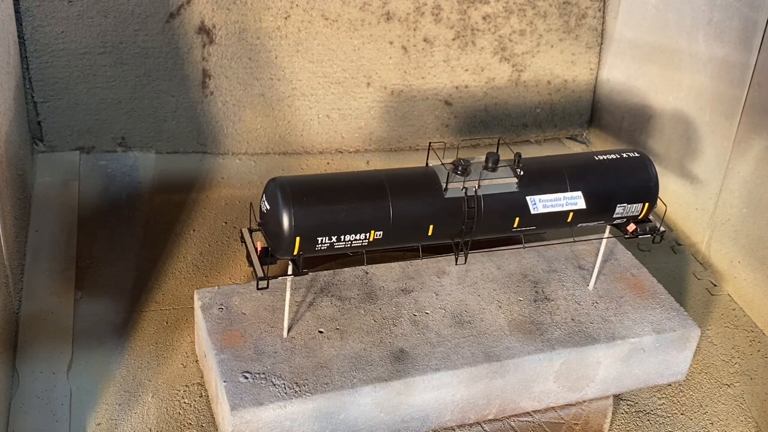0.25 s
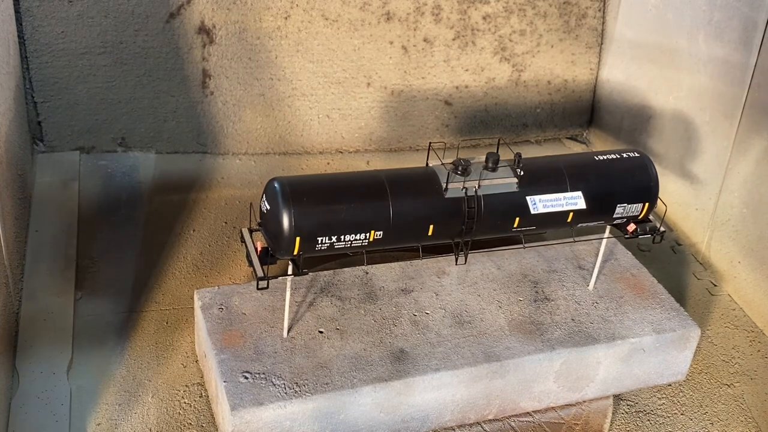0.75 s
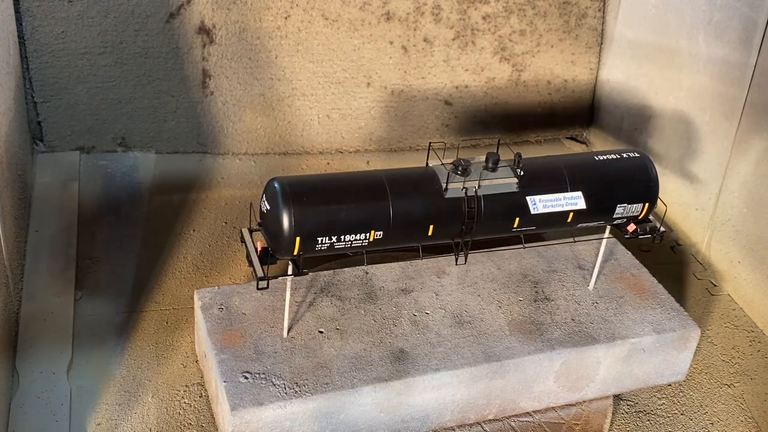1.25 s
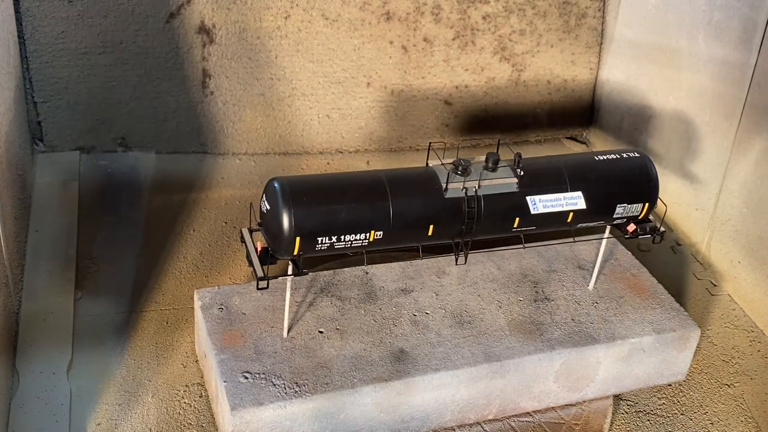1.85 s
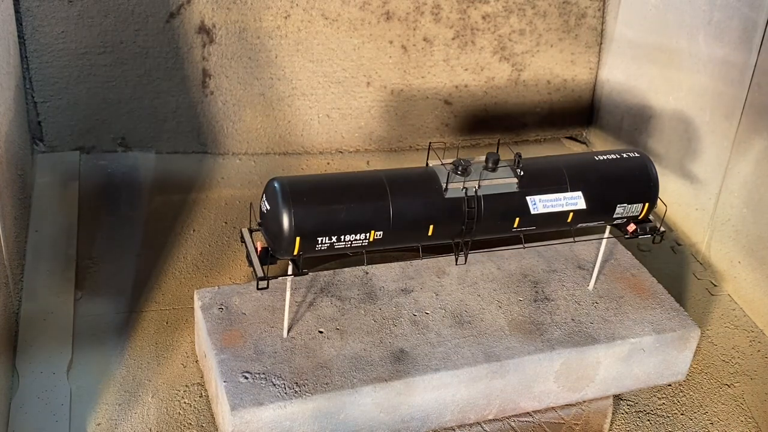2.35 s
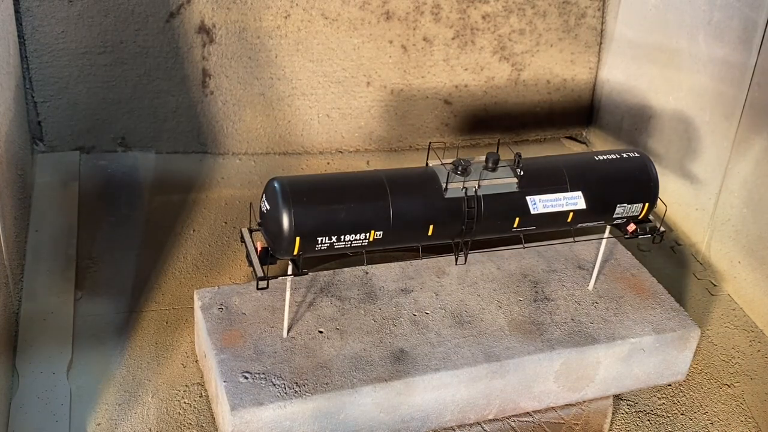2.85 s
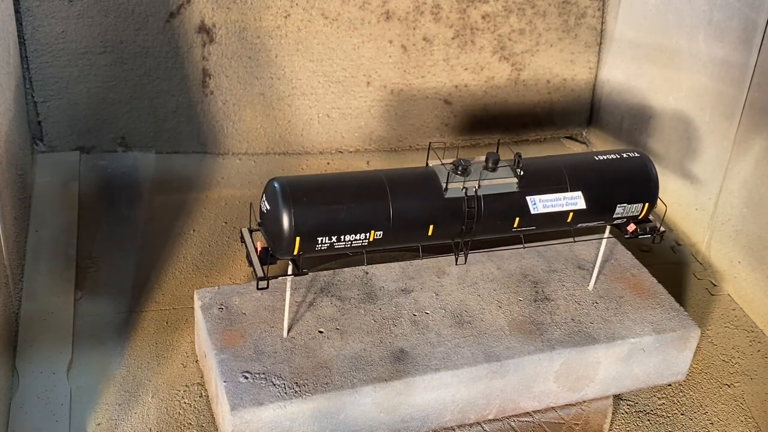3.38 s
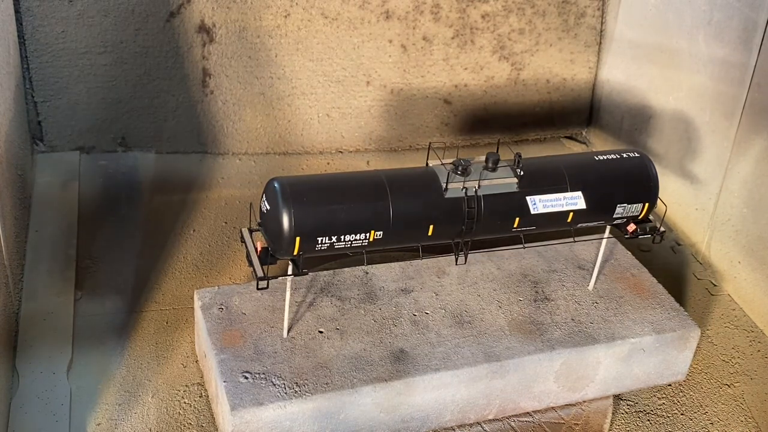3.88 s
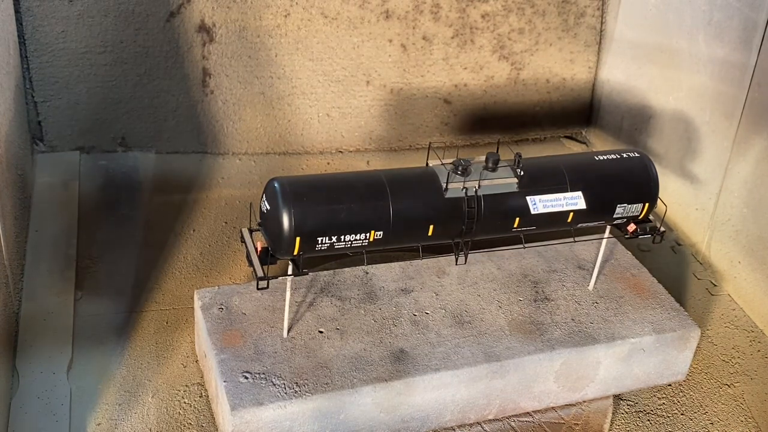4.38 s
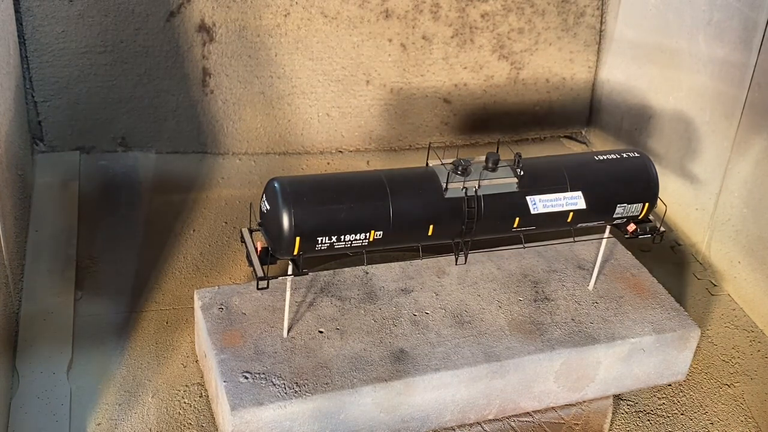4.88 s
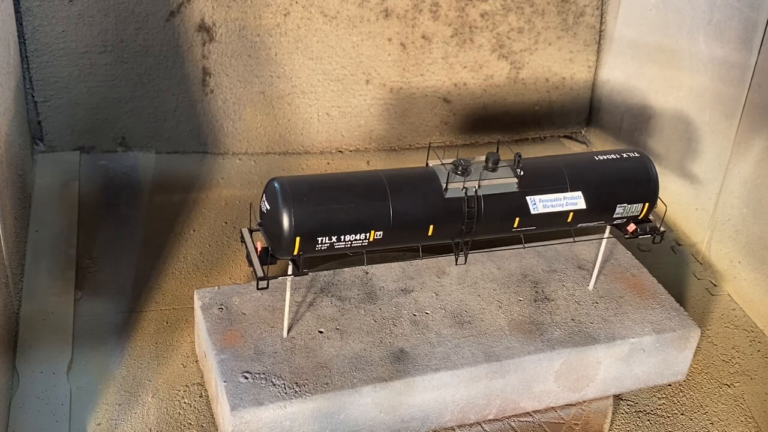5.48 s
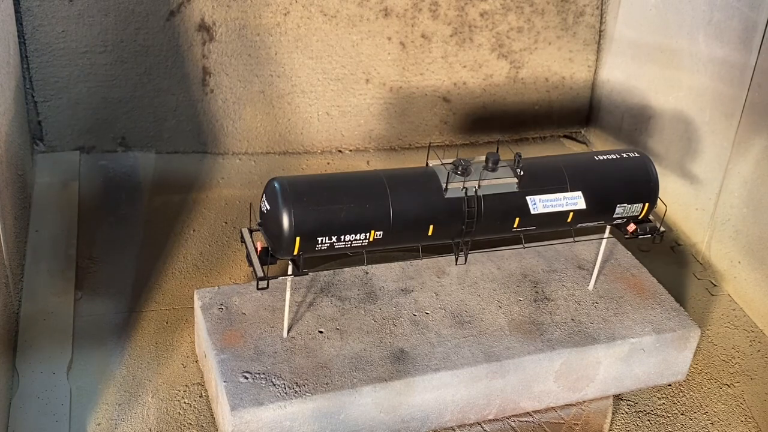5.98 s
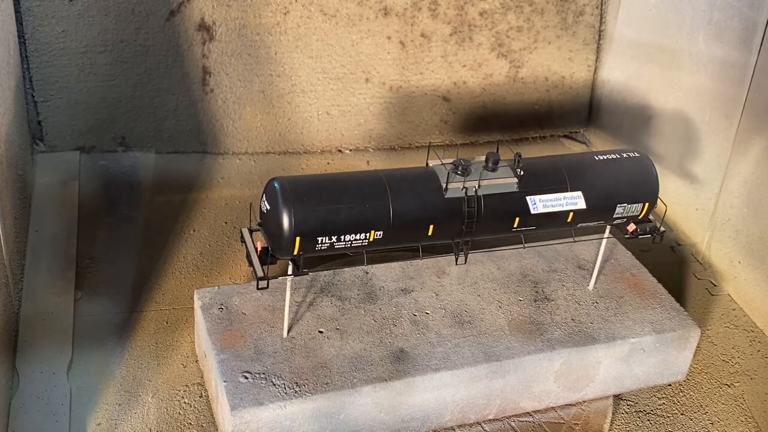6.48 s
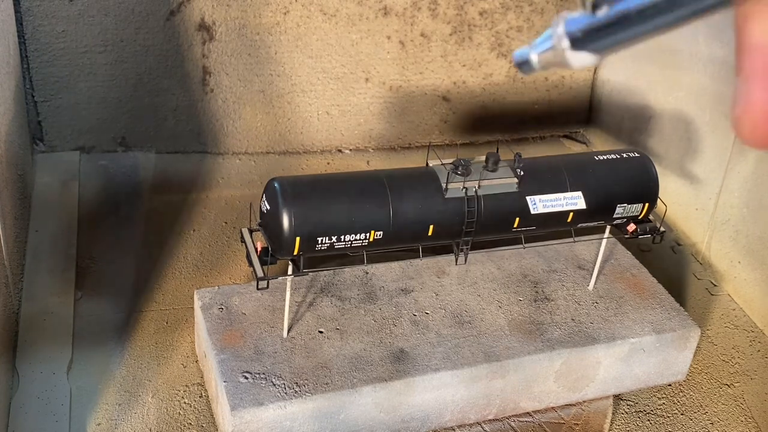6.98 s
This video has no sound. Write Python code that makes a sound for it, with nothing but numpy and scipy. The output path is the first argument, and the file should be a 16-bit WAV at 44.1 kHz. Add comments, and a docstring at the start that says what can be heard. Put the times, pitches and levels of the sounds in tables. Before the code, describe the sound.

After a hard click and some handling clatter, a fan's hum climbs steadily while an airbrush sprays short, bright hisses in a workshop.

```python
"""An airbrush hisses in eight bursts: a noise jet gated by the trigger valve, with a shifting reflection.
Before it a switch snaps and a spray-booth fan runs up: air noise and a three-blade tone climb through
the booth's resonances while motor tones sing. Filtered noise and ringing modes make the knocks, ticks,
slides and a scrape; soft puffs are low rumble. Airbrush and handling ring briefly in a small workshop;
a close pair of microphones listens."""
import sys
import numpy as np
from scipy import signal
from scipy.fft import rfft, irfft, next_fast_len
from scipy.io import wavfile

SR = 44100
rng = np.random.default_rng(int(sys.argv[2]) if len(sys.argv) > 2 else 0)


def transcribe(u):
    """Save the signal u as a 16-bit wav file named by the first command-line argument.

    u: samples, shape (n,) or (channels, n), limited to [-1, 1]; the rate is SR.
    q: integer samples, one column per channel.
    """
    v = np.clip(np.atleast_2d(u).T, -1, 1)
    q = np.round(v * 32767).astype(np.int16)
    wavfile.write(sys.argv[1], SR, q)


N = 318843
TIME = np.arange(N) / SR
ROOM_T60_S = 0.32
# the fan starts, then nears its top turning rate exponentially with this time constant
FAN_ON_S, RUN_UP_S, TOP_SHAFT_HZ = .3, 6.0, 181.0

# balance of the fan between the microphones: (frequency [Hz], left minus right [dB])
FAN_BALANCE = [(110, 0), (200, -.8), (380, -2.8), (520, 0), (650, 2.5), (850, 4.5), (1200, .5), (1900, 0)]
# ringing modes of the booth panel: (frequency [Hz], relative level [dB], t60 [s])
PANEL_MODES = [(268, 10, 0.17), (444, 1, 0.12), (870, -7.5, 0.19), (1197, 0.5, 0.17), (1370, -9, .2),
               (1970, 12.5, 0.11), (2470, -7.5, 0.062), (4097, -16, .15)]


def from_db(db):
    """Decibels to gain."""
    return 10 ** (np.asarray(db) / 20)


def rms_one(x):
    """Scale to unit rms."""
    return x / np.sqrt(np.mean(x ** 2) + 1e-20)


def at_hz(points, hz):
    """Read a table on a log-frequency axis."""
    f, value = np.transpose(points)
    return np.interp(np.log(np.maximum(hz, 1)), np.log(f), value)


def bins(size):
    """Frequencies of a real FFT."""
    return np.arange(size // 2 + 1) * SR / size


def drift(rate_hz):
    """Smooth random wandering, rms 1, slower than about rate_hz."""
    return rms_one(irfft(rfft(rng.standard_normal(N)) / (1 + (bins(N) / rate_hz) ** 2), N))


def low_pass(x, hz):
    """Second-order low-pass."""
    return signal.sosfilt(signal.butter(2, min(hz, .45 * SR), fs=SR, output="sos"), x)


def high_pass(x, hz):
    """Fourth-order high-pass."""
    return signal.sosfilt(signal.butter(4, hz, "high", fs=SR, output="sos"), x)


def noise(colour, size=N, width_db=0):
    """Stereo noise of a given spectrum, width set by frequency; almost mono from 2 to 6.5 kHz; rms 1."""
    # stereo width: (frequency [Hz], side minus mid [dB])
    stereo_width = [(30, -24.5), (80, -17), (160, -27), (300, -15.5), (640, -8.5), (1450, -3), (1800, -5.5),
                    (2100, -45.5), (4500, -54), (6500, -45.5), (15000, -9.5)]
    hz = bins(size)
    mid, side = rfft(rng.standard_normal((2, size)))
    side = side * from_db(at_hz(stereo_width, hz) + width_db)
    pair = mid + side * [[1], [-1]]
    return rms_one(irfft(pair * from_db(at_hz(colour, hz)), size))


def dying(t60, size):
    """Envelope that falls 60 dB in t60 seconds."""
    return np.exp(-np.log(1000) * TIME[:size] / t60)


def swell(peak_s, rise_s, fade_s, hold_s=0):
    """Envelope that rises 60 dB in rise_s, holds, and falls 60 dB in fade_s."""
    before = np.maximum(peak_s - TIME, 0) / rise_s
    after = np.maximum(TIME - peak_s - hold_s, 0) / fade_s
    return from_db(-60 * (before + after)) + 1e-12


def add(out, s, sound):
    """Mix a sound in at time s."""
    start = max(round(s * SR), 0)
    out[:, start:start + sound.shape[-1]] += sound[..., :N - start]


def taps(events, colour, t60, size=11025):
    """Damped contacts: bursts of noise that die away at once."""
    out = np.zeros((2, N))
    for s, level_db in events:
        add(out, s, from_db(level_db) * noise(colour, size) * dying(t60, size))
    return out


def ringing(modes, size):
    """Decaying sines of a struck body, each with a random sign."""
    ring = 0
    for hz, mode_db, t60 in modes:
        sine = np.sin(2 * np.pi * hz * TIME[:size]) * rng.choice([-1, 1])
        ring = ring + from_db(mode_db) * dying(t60, size) * sine
    return ring


def still_workshop(level_db):
    """Steady, mostly low background noise of the room."""
    # room tone: (frequency [Hz], relative level [dB per Hz])
    floor_colour = [(20, -27.5), (35, -6), (55, 1.5), (90, 0), (180, -12.5), (400, -12), (600, -28.5),
                    (1200, -35.5), (3000, -43.5), (8000, -48), (16000, -56.5)]
    return from_db(level_db) * noise(floor_colour)


def rubbing(grain_db):
    """Light, uneven slides of hand and hose: swelling friction noise, each low-passed at a set frequency."""
    # friction noise: (frequency [Hz], relative level [dB per Hz])
    rub_colour = [(200, -5), (800, 1.5), (2700, 1), (4500, -3), (8000, -7), (15000, -13)]
    # slides: (strongest at [s], level before the low-pass [dB], swell [s], fade [s], low-pass [Hz])
    slides = [(.06, -68.5, .5, 0.54, 2230), (.265, -63.5, .35, 0.3, 2810), (.872, -63, 0.043, 0.22, 12000),
              (1.315, -64.5, 0.22, 0.66, 12000), (1.5, -75, 0.55, .6, 12000), (1.63, -66, .6, 0.13, 12200),
              (2.1, -75.5, 0.89, 0.85, 3540)]
    friction = noise(rub_colour) * from_db(grain_db * drift(60))
    out = 0
    for s, level_db, rise_s, fade_s, low_pass_hz in slides:
        out = out + from_db(level_db) * swell(s, rise_s, fade_s) * low_pass(friction, low_pass_hz)
    return out


def finger_on_switch():
    """A finger lands on the switch: one dull burst of noise."""
    # thud noise: (frequency [Hz], relative level [dB per Hz])
    thud_colour = [(60, -33), (150, -10), (260, -1), (330, 3.5), (430, -2), (600, -17), (1500, -26),
                   (5000, -52)]
    thud_s, thud_db = .184, -43.5   # level before the low-pass
    return low_pass(taps([(thud_s, thud_db)], thud_colour, t60=.2), hz=700)


def knocks(clack_t60, ring_db, lowest_hz=165, size=22050):
    """Each contact gives a short, even clack and rings the panel; soft contacts are duller."""
    # knocks on the booth, the switch first: (time [s], relative level [dB], contact brightness [Hz])
    contacts = [(0.1995, -49, 2470), (0.2544, -65, 3970), (0.2948, -16, 12000), (0.297, -12, 3230),
                (0.3027, -5.5, 897), (1.4007, -29, 2380), (1.422, -30.5, 2400), (1.5094, -38, 1900),
                (1.753, -55, 2200), (1.779, -53, 2200), (1.838, -55.5, 2500), (1.8673, -54, 2500),
                (2.011, -59, 2540)]
    # clack noise: (frequency [Hz], relative level [dB per Hz])
    clack_colour = [(60, -29.5), (130, -12.5), (220, 5), (380, -4.5), (700, -2.5), (1300, -1.5), (2000, 1),
                    (3000, -3.5), (5000, -7.5), (8000, -13), (15000, -15.5)]
    clack_gain = from_db(at_hz(clack_colour, bins(size)))
    out = np.zeros((2, N))
    for s, level_db, contact_hz in contacts:
        ring = ringing(PANEL_MODES, size)
        burst = rfft(noise(clack_colour, size) * dying(clack_t60, size))
        # keep only the burst's phase, so that no frequency stands out by chance
        even_burst = irfft(burst / np.abs(burst) * clack_gain, size)
        clack = even_burst * dying(ROOM_T60_S, size)
        knock = from_db(24) * clack + from_db(ring_db) * ring
        add(out, s, from_db(level_db) * low_pass(knock, contact_hz))
    return high_pass(out, lowest_hz)   # a small panel radiates little bass


def fan_speed(t):
    """Share of top speed: the motor runs up exponentially."""
    return 1 - np.exp(-np.maximum(t - FAN_ON_S, 1e-3) / RUN_UP_S)


def booth_lift_db(hz):
    """What the booth's air resonances add to, or take from, a frequency."""
    # air resonances: (frequency [Hz], width [Hz], lift [dB])
    resonances = [(170.8, 7.3, 8.5), (244.5, 97, 12.5), (333.5, 57, -10.5), (397, 24, 2.5),
                  (422.5, 65, 9.5), (643, 45, 9.5), (1718, 43, 8.5)]
    return sum(lift_db / (1 + (2 * (hz - f) / width) ** 2) for f, width, lift_db in resonances)


def booth_db(hz):
    """Colour of the fan's air noise as it leaves the booth."""
    # fan air noise at the last speed reached: (frequency [Hz], relative level [dB per Hz])
    fan_colour = [(25, -40), (50, -16), (110, -14), (170, -10), (300, -9), (520, -14.5), (750, -17),
                  (1200, -28.5), (2600, -27.5), (3300, -36), (4600, -34), (8000, -48.5), (12000, -58.5),
                  (16000, -74)]
    return at_hz(fan_colour, hz) + booth_lift_db(hz)


def fan_air(level_db, gust_db, size=2048):
    """Turbulence grows with fan speed, the treble faster than the bass."""
    # growth of the air noise with speed: (frequency [Hz], exponent [power of the speed])
    speed_power = [(60, 0.71), (240, 2.37), (420, 2.29), (700, 2.75), (1500, 3.2), (5000, 4.55)]
    hz = bins(N)
    colour = from_db(booth_db(hz) + at_hz(FAN_BALANCE, hz) * [[.5], [-.5]])
    nearly_white = noise([(20, 0.0097), (20000, 0)])
    air = rms_one(irfft(rfft(nearly_white) * colour, N))
    f, t, frames = signal.stft(air, SR, nperseg=size)
    growth = (fan_speed(t) / fan_speed(TIME[-1])) ** at_hz(speed_power, f)[:, None]
    grown = signal.istft(frames * growth, SR, nperseg=size)[1][:, :N]
    return grown * from_db(level_db + gust_db * drift(22))


def fan_tone(hz, level_db, waver_db):
    """A gliding sine of a given rms level, shaken by turbulence."""
    gain_db = level_db + waver_db * drift(24) + at_hz(FAN_BALANCE, hz) * [[.5], [-.5]]
    turns = np.cumsum(hz) / SR + rng.random()
    return np.sqrt(2) * from_db(gain_db) * np.sin(2 * np.pi * turns)


def fan_tones(whine_db, count=3):
    """Blade tone shaped by speed and booth; motor tones sing in turn as they cross the housing resonance."""
    # motor whine: (multiple of the turning rate [ratio], relative level [dB])
    whine = [(5.13, -61.5), (7.17, -57.5), (9.2, -58.5), (11.5, -59), (13.6, -62), (17, -63.5)]
    housing_hz, housing_width_hz = 402, 90
    # level at the last speed reached [dB], power of the speed, share of the booth's lift
    blade_end_db, blade_growth, blade_coupling = -41, 2.77, .65
    blade_low_cut_hz = 165   # the duct carries little of a slower blade tone
    speed = fan_speed(TIME)
    shaft_hz = TOP_SHAFT_HZ * speed
    blade_hz = count * shaft_hz

    blade_db = blade_end_db + blade_growth * 20 * np.log10(speed / speed[-1])
    blade_db = blade_db + blade_coupling * booth_lift_db(blade_hz)
    blade_db = blade_db - 10 * np.log10(1 + (blade_low_cut_hz / blade_hz) ** 12)
    out = fan_tone(blade_hz + 1.22 * drift(5.6), blade_db, waver_db=1.3)
    for multiple, tone_db in whine:
        hz = multiple * shaft_hz
        off_resonance_db = 20 * np.log10(1 + (2 * (hz - housing_hz) / housing_width_hz) ** 2)
        level_db = tone_db + whine_db - off_resonance_db
        out = out + fan_tone(hz + 2.57 * drift(7.9), level_db, waver_db=0.5)
    return out * np.clip(TIME - FAN_ON_S, 0, 1)   # all tones fade in over one second


def puffs():
    """Soft low bumps and puffs of air: brief bell-shaped swells of rumble."""
    # puffs: (peak time [s], level at the peak [dB], spread of the bell [s])
    bumps = [(0.645, -63, .008), (2.367, -51, 0.0039), (2.788, -53, 0.0055), (3.824, -40, 0.011),
             (5.512, -44.5, 0.011), (7.14, -41.5, 0.013)]
    # rumble: (frequency [Hz], relative level [dB per Hz])
    puff_colour = [(25, -28), (55, 8), (120, -3.5), (250, -14), (700, -26.5), (2000, -54)]
    envelope = 0
    for s, level_db, spread_s in bumps:
        envelope = envelope + from_db(level_db) * np.exp(-.5 * ((TIME - s) / spread_s) ** 2)
    return noise(puff_colour) * envelope


def ticks(tick_t60, ring_db, size=11025):
    """Metal meets metal: a sharp tick and a brief ring of the airbrush's body."""
    # ticks of the airbrush and its trigger: (time [s], level [dB])
    tick_events = [(1.069, -42.5), (1.1798, -62), (1.312, -33), (1.3626, -41.5), (1.425, -45),
                   (1.502, -51.5), (3.63, -42), (4.4695, -30), (5.3158, -33), (5.333, -38), (6.216, -47)]
    # tick noise: (frequency [Hz], relative level [dB per Hz])
    tick_colour = [(800, -23), (2500, -14), (4200, -2.5), (8000, -4), (12000, 6), (15500, 8)]
    # modes of the airbrush's metal body: (frequency [Hz], relative level [dB], t60 [s])
    brush_modes = [(2800, -13, .05), (3910, -6, 0.027), (5920, -2, 0.028), (6700, -2, 0.026)]
    out = taps(tick_events, tick_colour, tick_t60)
    for s, level_db in tick_events:
        add(out, s, from_db(level_db + ring_db) * ringing(brush_modes, size))
    return out


def scrape(grain_db, slips_per_s, ring_db, size=11025):
    """A heavier slide along the booth floor starts at once, weakens and stops; its slips ring the panel."""
    # scrape noise: (frequency [Hz], relative level [dB per Hz])
    scrape_colour = [(100, 2), (250, -1), (750, 11), (1400, -0.5), (2400, -8), (3500, -17), (8000, -21),
                     (15000, -27)]
    start_s, swell_s, length_s, fade_s = 1.402, 0.01, 0.12, .25
    start_db, sag_db_per_s = -48.5, 60
    level_db = start_db - sag_db_per_s * np.clip(TIME - start_s, 0, length_s)
    force = swell(start_s, swell_s, fade_s, length_s) * from_db(level_db + grain_db * drift(70))
    slips = force * (rng.random(N) < slips_per_s / SR) * rng.choice([-1, 1], N)
    ring = signal.fftconvolve(slips, ringing(PANEL_MODES, size))[:N]
    return noise(scrape_colour) * force + from_db(ring_db) * ring


def trigger(closing_s):
    """Strength of high and low hiss: each pull opens the valve, swells or sags evenly, then snaps shut."""
    # pulls: (air on [s], air off [s], opening time [s], relative hiss level [dB],
    #         swell from start to end [dB], low hiss relative to the hiss before their gains [dB])
    pulls = [(2.166, 2.31, 0.015, -32, 0, -14), (2.541, 2.762, 0.011, -31, 0.3, -14),
             (2.983, 3.551, 0.014, -29.5, 0.5, -13), (3.789, 4.426, 0.012, -31, -0.3, -13),
             (4.663, 5.27, 0.019, -31, 1, -13), (5.495, 6.097, 0.015, -31.5, -1, -12),
             (6.395, 6.764, 0.018, -30, 3, -11.3), (7.105, 7.3, 0.019, -28, 2, -11)]
    high, low = 0, 0
    for on, off, opening, level_db, swell_db, low_db in pulls:
        opened = np.clip((TIME - on) / opening, 0, 1)
        valve = opened * np.exp(-np.maximum(TIME - off, 0) / closing_s)
        progress = np.clip((TIME - on) / (off - on), 0, 1)
        flow = valve * from_db(level_db + swell_db * (progress - .5))
        high = high + flow
        low = low + flow * from_db(low_db)
    return high, low


def airbrush(hiss_db, low_db, split_hz, closing_s, spatter_db, tremor_db, bounce):
    """A valve-gated jet; finger tremor and paint roughen it, and the booth wall adds a shifting reflection."""
    # jet noise: (frequency [Hz], relative level [dB per Hz])
    jet_colour = [(300, -22), (1100, -22), (1600, -19), (2150, -11.5), (2600, -13), (2950, -10),
                  (3400, -15), (4650, -8.5), (6200, -8), (7800, -5), (9000, -6), (10800, -5.5), (12500, -2),
                  (15600, 0)]
    high, low = trigger(closing_s)
    jet = noise(jet_colour, width_db=-15)
    body = irfft(rfft(jet) / (1 + (bins(N) / split_hz) ** 8), N)   # the low hiss
    jet = (jet - body) * high * from_db(hiss_db) + body * low * from_db(low_db)
    jet = jet * from_db(spatter_db * drift(120) + tremor_db * drift(6))
    lag_s = .0022 + 0.00014 * drift(1)   # the hand moves, so the path by the wall changes
    reflection = np.array([np.interp(TIME - lag_s, TIME, channel) for channel in jet])
    return jet + bounce * reflection


def workshop(x, wet_db, size=22050):
    """Direct sound plus a diffuse tail that builds up as the first reflections arrive."""
    build_up = np.minimum(TIME[:size] / 0.0047, 1)
    tail = noise([(100, 6), (5000, 6), (16000, -2.0)], size) * dying(ROOM_T60_S, size) * build_up
    tail /= np.sqrt(np.sum(tail ** 2) / 2)
    return x + from_db(wet_db) * signal.fftconvolve(x, tail, axes=1)[:, :N]


def scene():
    """Fan, airbrush and handling in the workshop."""
    slides = rubbing(grain_db=2.6) + scrape(grain_db=3.5, slips_per_s=250, ring_db=-30)
    handling = workshop(finger_on_switch() + slides, wet_db=-8.0)
    panel = workshop(knocks(clack_t60=0.053, ring_db=-34.5), wet_db=-9.0)
    fan = fan_air(level_db=-36.0, gust_db=1.02) + fan_tones(whine_db=-1.0)
    metal = workshop(ticks(tick_t60=0.016, ring_db=-14), wet_db=-10.5)
    jet = airbrush(hiss_db=4.5, low_db=15.5, split_hz=5700, closing_s=0.008,
                   spatter_db=0.73, tremor_db=0.5, bounce=0.21)
    spray = workshop(jet, wet_db=-16.0)
    return fan + spray + panel + metal + handling + puffs() + still_workshop(level_db=-60.5)


def record(dry):
    """The microphones go in and out of phase up the treble; deep bass and the top are cut."""
    # phase between the microphones: (frequency [Hz], lag of the left [turns])
    port_lag = [(300, 0), (620, -.09), (1100, .05), (1700, 0), (7400, 0), (8750, .5), (9350, .5),
                (10600, 1), (11550, 1), (13100, 1.5), (13550, 1.5), (15100, 2)]
    low_cut_hz, cutoff_hz = 38, 15850
    size = next_fast_len(N + 4096)
    hz = bins(size)
    left_turns = np.interp(hz, *np.transpose(port_lag))
    lag = np.exp(-2j * np.pi * left_turns * [[1], [0]])
    top = 1 / np.sqrt(1 + (hz / cutoff_hz) ** 400)   # very steep low-pass
    return irfft(rfft(high_pass(dry, low_cut_hz), size) * lag * top, size)[:, :N]


dry = scene()
out = record(dry)
transcribe(out)
```